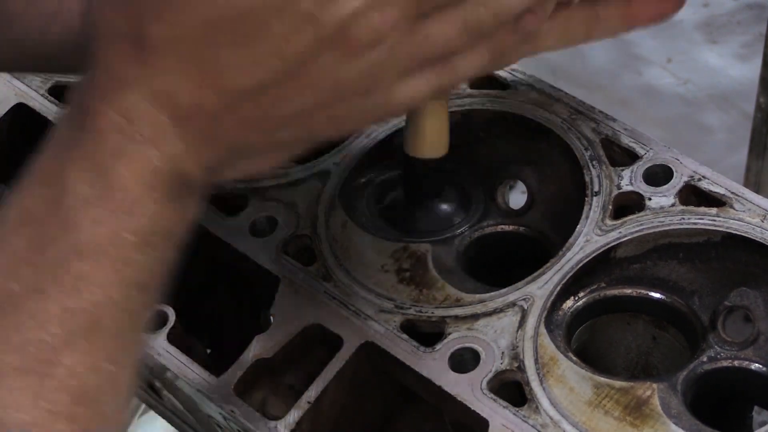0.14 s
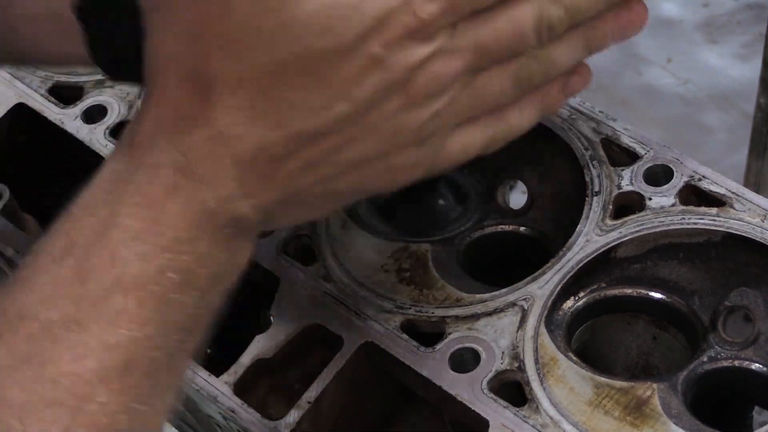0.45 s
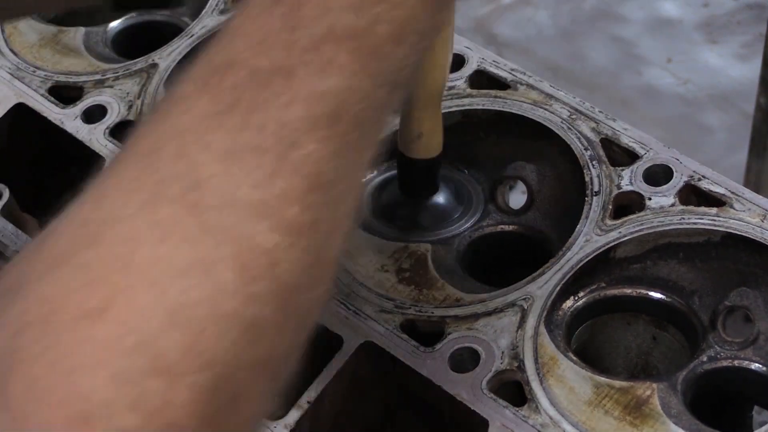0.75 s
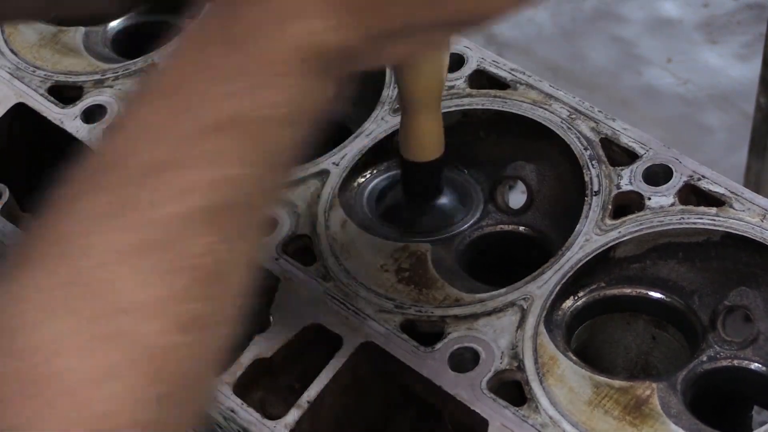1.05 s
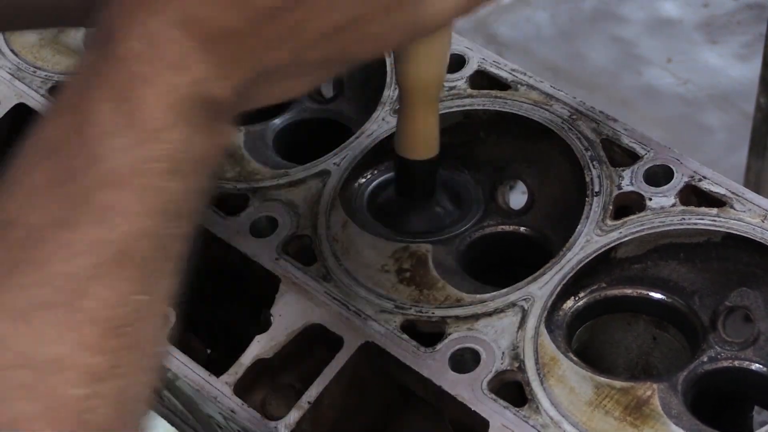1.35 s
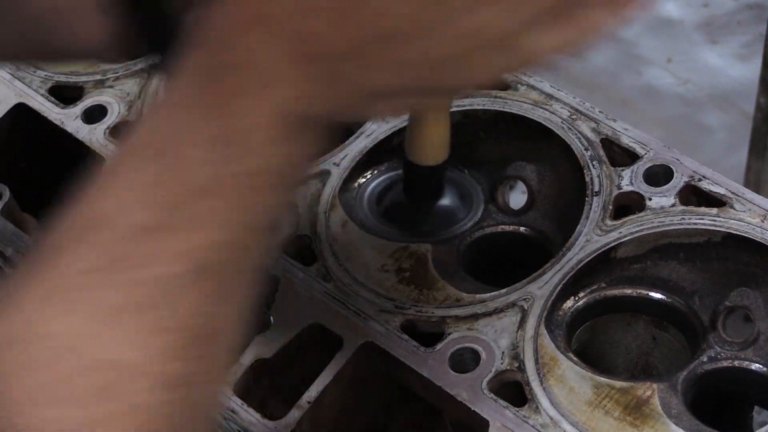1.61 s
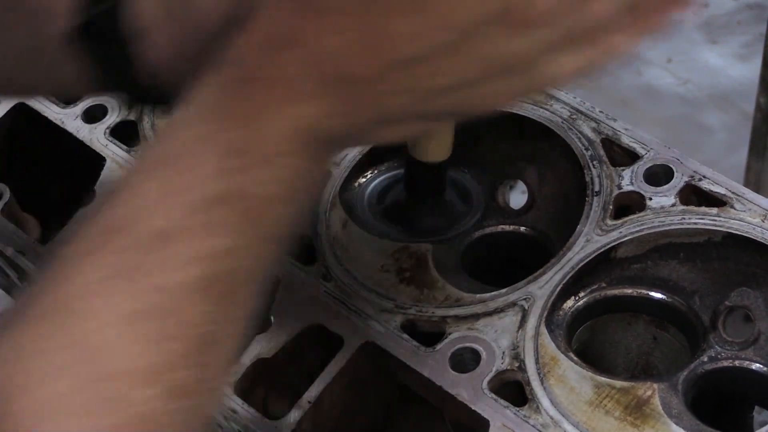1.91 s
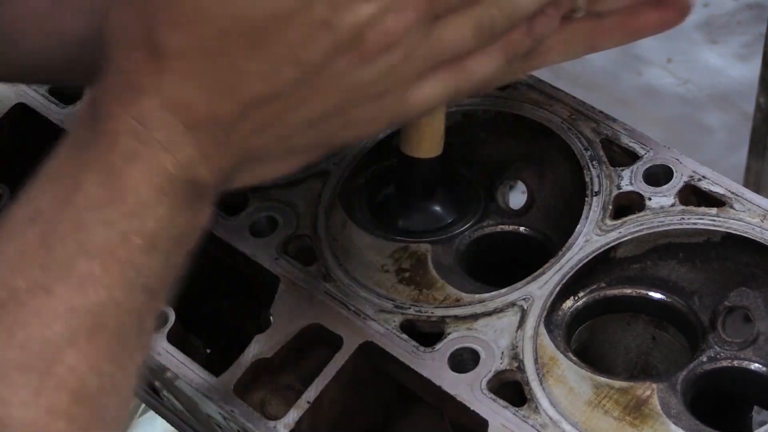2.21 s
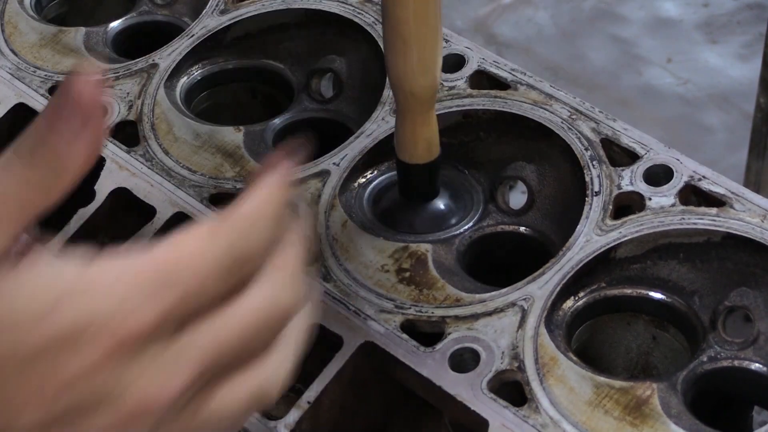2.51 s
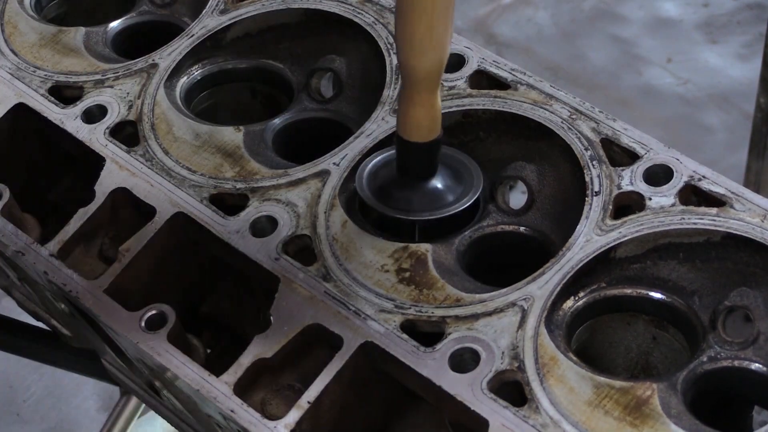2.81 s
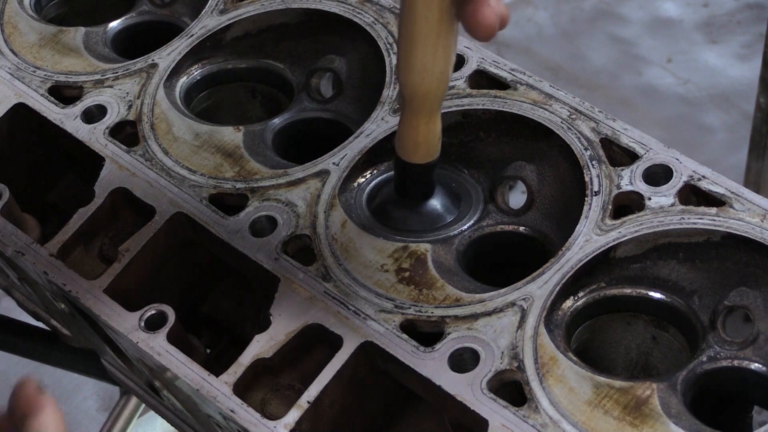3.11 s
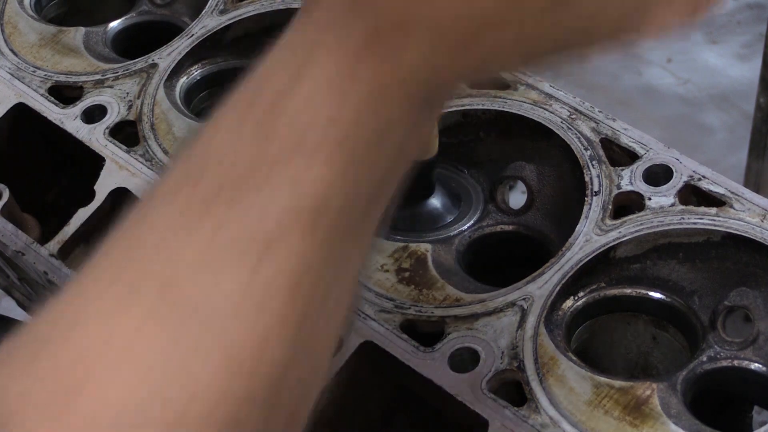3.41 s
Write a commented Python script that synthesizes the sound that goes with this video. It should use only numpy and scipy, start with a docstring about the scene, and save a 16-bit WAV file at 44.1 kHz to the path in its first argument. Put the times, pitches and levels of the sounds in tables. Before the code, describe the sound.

Gritty metal valve grinding in quick to-and-fro strokes, two bursts split by a short gap, with sharp wooden snaps; then a pause and a ringing metal clank. Close single-channel microphone in a hard, lightly echoing garage.

```python
"""Valve on a suction stick, rubbed to and fro between the palms in its seat in a metal cylinder head.
About nine strokes a second: grains crunch at the contact and ring the casting and valve modes.
The wooden stick snaps twice, fingers brush it, the bench knocks; the valve is lifted and dropped back.
Hard garage, one microphone channel: the diffuse tail lies 13 dB under the direct sound and starts
13 ms late, some 4.5 m of extra path. Low rumble and faint hiss of shaped noise lie underneath."""
import sys
import numpy as np
from scipy import signal
from scipy.fft import rfft, irfft
from scipy.io import wavfile

SR = 44100
rng = np.random.default_rng(int(sys.argv[2]) if len(sys.argv) > 2 else 0)


def rack_gain(trim_db):
    """Turn a fader trim in dB into the linear factor to multiply a signal by."""
    fader = np.asarray(trim_db, float)
    return 10 ** (fader / 20)


def persist_wave(psi):
    """Save psi, clipped to +-1, as 16-bit WAV."""
    counts = np.round(np.clip(psi, -1, 1) * 32767).astype(np.int16)
    wavfile.write(sys.argv[1], SR, np.atleast_2d(counts).T)


N = 156555

# Strokes of the palms: start [t/s], length [t/s], then grit, low shudder, middle ring, scrape [level/dB]
STROKES = [(-.05, .095, -29, -46, -33, -37.5), (0.023, 0.15, -32, -51, -37, -41.5),
           (0.156, 0.1, -22, -23.5, -27.5, -19.5), (0.259, 0.072, -22.5, -22.5, -19.5, -24),
           (0.356, 0.093, -24.5, -32, -35, -21.5), (0.444, 0.085, -37.5, -27, -56, -34.5),
           (0.837, 0.15, -21.5, -16.5, -24, -21), (0.989, 0.12, -21.5, -17, -27.5, -23),
           (1.096, 0.14, -20, -26, -26.5, -23.5), (1.214, 0.14, -23.5, -39.5, -28, -26.5),
           (1.336, 0.12, -23, -34, -30.5, -29), (1.441, 0.12, -23.5, -41, -25.5, -38),
           (1.544, 0.13, -26.5, -52.5, -32.5, -34), (1.653, 0.13, -28, -54, -33.5, -44.5),
           (1.769, 0.13, -29, -48.5, -39, -40), (1.874, 0.17, -30, -54.5, -36.5, -49.5),
           (2.019, 0.0854, -24, -16, -36, -26.5), (2.093, 0.1, -21.5, -26, -25, -27),
           (2.197, 0.13, -24.5, -25.5, -30.5, -29), (2.323, 0.081, -30, -26, -33, -31)]
# Speeding up, as a share of the stroke, for grit, shudder, ring, scrape [1]
RISE_SHARE = [0.29, 0.12, 0.11, 0.24]
# Slowing down, as a share of the stroke, for the same four layers [1]
FALL_SHARE = [0.29, 0.43, 0.27, .3]
# How steeply the same four layers follow speed: exponent [1]
SPEED_POWER = [2.08, 1.28, 0.61, 3.7]
# Broad crunch of fine grit, spectrum: [f/Hz], [level/dB per Hz]
GRIT_SPECTRUM = [(1470, -39.5), (2500, -2), (3150, -11), (3400, -9.5), (5490, -0.5), (6260, -9.5),
                 (6820, -4.5), (10600, 0.5), (15800, -17)]
# Scrape of coarse grains, spectrum: [f/Hz], [level/dB per Hz]
SCRAPE_SPECTRUM = [(350, -35.5), (480, -31), (700, 4.5), (1100, 4.5), (1900, 6), (2600, -2.5),
                   (4000, -10.5), (6000, -46.5)]
# Low casting and valve modes: [f/Hz], rubbed [relative level/dB], struck [level/dB], t60 [t/s]
LOW_MODES = [(576.4, 5.5, -1.5, 0.19), (565, -13, -0.5, 0.47), (603.5, -5, -9, 0.042),
             (647.4, -6.5, -10, 0.18), (741, -10, 4.5, 0.017), (520, -8, -4, .06)]
# Middle casting and valve modes: [f/Hz], rubbed [relative level/dB], struck [level/dB], t60 [t/s]
MIDDLE_MODES = [(1447, 2, -7, .11), (1456, -6.5, -34, 1.41), (1488, -1, -40, 0.037), (1711, -3, -4.5, 0.12),
                (1850, -11.5, -7.5, 0.084), (1323, -7.5, -22, 0.069)]
# High casting and valve modes: [f/Hz], rubbed [relative level/dB], struck [level/dB], t60 [t/s]
HIGH_MODES = [(2579, 4.5, -8.5, .15), (3037, -1, -21.5, 0.57), (3068, -1.5, -9, 0.11),
              (3201, -1.5, -29.5, 0.6), (3977, -1.5, -10, 0.058), (4285, -0.5, -17, 0.24),
              (4600, -2.5, 1, 0.023), (5190, -21, -18, 0.18), (5688, 7, -0.5, .17), (6670, -0.5, -42, 0.1),
              (6875, -1.5, -19, 0.13), (7280, -6, -29, 0.15), (8390, -0.5, -40, 0.2), (8662, -5, -25, 0.2),
              (9220, 1, -22, 0.15), (9580, -5, -10, 0.28), (9600, -12, -17, 0.12), (9900, -7, -29, 0.22),
              (10460, -17, -19, 0.27), (11100, -16, -15, 0.31), (11700, -3, -13, .1),
              (12200, -13, -13, 0.08), (12530, -23, -51, 2)]
# Low rumble, level over time: [t/s], [level/dB]
RUMBLE_LEVEL = [(0.0, -49), (0.34, -47.5), (0.63, -52.5), (1.4, -49.5), (2.49, -47.5), (2.88, -61),
                (3.55, -48)]
# Low rumble, spectrum: [f/Hz], [level/dB per Hz]
RUMBLE_SPECTRUM = [(12, -10), (20, 4.5), (43, 6), (107, 4.5), (219, -4.5), (302, -6), (420, -13),
                   (550, -10), (920, -120)]
# Faint hiss, spectrum: [f/Hz], [level/dB per Hz]
HISS_SPECTRUM = [(150, -16), (250, 5.5), (700, -5), (1500, -8), (3000, -14.5), (6000, -16.5), (12000, -17),
                 (15800, -32)]
# Decay of the garage: [f/Hz], t60 [t/s]
GARAGE_DECAY = [(300, 1), (800, 0.67), (2000, 1), (5000, 1), (9000, 0.33), (14000, 0.49)]
# Snaps of the stick: [t/s], click [level/dB], base pitch [f/Hz]
SNAPS = [(.1199, -1, 1770), (1.969, -7.5, 1830)]
# Resonances of the wooden stick: ratio to the base pitch [1], [level/dB], t60 [t/s]
STICK_MODES = [(.62, -28.5, 0.023), (1.01, 0, .012), (1.2, -9.5, 0.015), (1.55, -20.5, 0.017),
               (1.9, -57, .006)]
# Dull knocks in the bench: [t/s], click [level/dB], resonance [f/Hz]
THUDS = [(.58, -32.5, 97), (2.631, -30.5, 59.2), (3.108, -28, 89.3)]
# Valve touches its seat: [t/s], [level/dB], rattle decay to 1/e [t/s], treble tilt above 1 kHz [dB/octave]
TOUCHES = [(.782, -41.5, 0.0099, -2), (.804, -27, 0.0034, -7), (2.712, -42.5, 0.022, -1.5),
           (3.110, -10.5, 0.047, 0.07)]
# Broad crack of a touch, spectrum: [f/Hz], [level/dB per Hz]
CRACK_SPECTRUM = [(400, -7), (600, 10), (1100, -14), (2000, -26), (3400, -20), (4500, 4.5), (6500, -25.5),
                  (11000, -5.5), (15800, -25)]
# Fingers on the stick: start [t/s], length [t/s], [level/dB]
BRUSHES = [(0.815, 0.042, -67), (2.695, 0.04, -70), (2.777, 0.12, -57.5), (3.459, 0.051, -44),
           (3.504, .035, -48)]
# Bright noise of the brushes, also of the clang, spectrum: [f/Hz], [level/dB per Hz]
BRIGHT_SPECTRUM = [(1000, 6.5), (4000, 0), (7000, -3.5), (10500, -6.5), (13000, -16), (15800, -20)]

DRAG_DB = -29  # against full speed, all through a stroke, so also while turning round
FINE_PER_S, FINE_SPREAD_DB = 9000, 1.5
COARSE_PER_S, COARSE_SPREAD_DB = 1400, 3.5
HIGH_RING_DB = -3.5  # against the grit
RUB_PATCHY_DB, MODE_PATCHY_DB, BAND_PATCHY_DB = 1.5, 2.5, 2.5  # rms of slow level drifts
HISS_DB = -57.5
GARAGE_DB, FIRST_WALL_S = -13, 0.013
THUD_T60_S = 0.057
RATTLE_PER_S, RATTLE_SHARE = 1500, 0.2  # share against the first blow
CRACK_DB = 2
CLANG_DB, CLANG_T60_S = -19, 0.72
SEATING_T60_S = 0.04  # the ring swells as the valve beds down
LOW_CUT_HZ = 393  # high-pass on the work; trims the low skirts of the modes
PEAK, TOP_HZ = 0.8, 15850


def rms_one(x):
    """Scale to rms 1."""
    return x / np.sqrt(np.mean(x ** 2) + 1e-20)


def at_hz(points, hz):
    """Read a table on a log-frequency axis."""
    table_hz, value = np.array(points).T
    return np.interp(np.log(hz), np.log(table_hz), value)


def colour(x, spectrum):
    """Weight a signal by a spectrum table; rms 1."""
    hz = np.maximum(np.fft.rfftfreq(len(x), 1 / SR), 1)
    return rms_one(irfft(rfft(x) * rack_gain(at_hz(spectrum, hz)), len(x)))


def drift(rate_hz):
    """Slow chance: noise smoothed by two equal poles; rms 1."""
    pole = np.exp(-2 * np.pi * rate_hz / SR)
    noise = rng.standard_normal(N + SR)
    smooth = signal.lfilter([1], [1, -2 * pole, pole * pole], noise)
    return rms_one(smooth[SR:])  # the first second lets the filter settle


def ring(x, hz, t60):
    """Damped resonance: a unit click sets a sine of height 1 ringing."""
    radius = rack_gain(-60 / (t60 * SR))
    angle = 2 * np.pi * hz / SR
    poles = [1, -2 * radius * np.cos(angle), radius * radius]
    return signal.lfilter([0, np.sin(angle)], poles, x + 1e-18)


def grains(per_s, spread_db):
    """Random clicks of uneven size and either sign; rms 1."""
    size_db = spread_db * np.minimum(rng.exponential(1, N), 4)
    sizes = rack_gain(size_db) * rng.choice([-1, 1], N)
    return rms_one(sizes * (rng.random(N) < per_s / SR))


def strokes():
    """Envelopes of grit, shudder, ring and scrape: each stroke speeds up, holds and slows."""
    t = np.arange(N) / SR
    envelopes = np.zeros((4, N))
    rise, fall = np.array(RISE_SHARE)[:, None], np.array(FALL_SHARE)[:, None]
    power = np.array(SPEED_POWER)[:, None]
    for start, length, *db in STROKES:
        u = (t - start) / length
        ramp = np.clip(np.minimum(u / rise, (1 - u) / fall), 0, 1)
        speed = np.sin(np.pi / 2 * ramp)
        drag = rack_gain(DRAG_DB) * (u > 0) * (u < 1)
        envelopes += rack_gain(np.array(db))[:, None] * (speed ** power + drag)
    return envelopes


def patchy(x, patchy_db):
    """Split into overlapping bands half an octave apart, each with a flicker of its own; rms 1."""
    octave = np.log2(np.fft.rfftfreq(N, 1 / SR) + 1)
    spectrum, out = rfft(x), 0
    for centre in np.arange(8.5, 13.5, 0.5):
        share = np.clip(1 - 2 * np.abs(octave - centre), 0, 1)
        out = out + irfft(spectrum * share, N) * rack_gain(patchy_db * drift(26))
    return rms_one(out)


def rubbed(modes, push, stream):
    """Modes driven by grains; the contact wanders, so modes come and go on five shared drifts."""
    norm = np.sqrt(sum(rack_gain(2 * mode[1]) for mode in modes))
    wander = [drift(10.3) for _ in range(5)]
    out = 0
    for k, (hz, db, _, t60) in enumerate(modes):
        unit = np.sqrt(4 * np.log(1000) / (t60 * SR))  # evens out long and short rings
        level = rack_gain(db + MODE_PATCHY_DB * wander[k % 5])
        shifted = np.roll(stream * level, int(hz))  # keeps the modes out of step
        out = out + unit * ring(shifted * push, hz, t60)
    return out / norm


def grinding():
    """Fine grit hisses and rings the high modes; coarse grains scrape and shake the lower ones."""
    grit, shudder, middle, scrape = strokes() * rack_gain(RUB_PATCHY_DB * drift(28))
    fine = grains(FINE_PER_S, FINE_SPREAD_DB)
    coarse = grains(COARSE_PER_S, COARSE_SPREAD_DB)
    out = grit * colour(fine, GRIT_SPECTRUM)
    out += scrape * patchy(colour(coarse, SCRAPE_SPECTRUM), BAND_PATCHY_DB)
    out += rubbed(LOW_MODES, shudder, coarse)
    out += rubbed(MIDDLE_MODES, middle, coarse)
    return out + rack_gain(HIGH_RING_DB) * rubbed(HIGH_MODES, grit, fine)


def background():
    """Low rumble of slowly changing level and steady faint hiss, both shaped noise."""
    t, db = np.transpose(RUMBLE_LEVEL)
    level = rack_gain(np.interp(np.arange(N) / SR, t, db))
    rumble = level * colour(rng.standard_normal(N), RUMBLE_SPECTRUM)
    return rumble + rack_gain(HISS_DB) * colour(rng.standard_normal(N), HISS_SPECTRUM)


def garage(x):
    """Diffuse tail: half-octave noise bands that die at their own rates, after the first-wall gap."""
    t = np.arange(SR) / SR
    tail, edges = 0, 150 * 2 ** np.arange(0, 7, 0.5)
    for low, high in zip(edges, edges[1:]):
        band_pass = signal.butter(2, [low, high], "band", fs=SR, output="sos")
        band = signal.sosfilt(band_pass, rng.standard_normal(SR))
        t60 = at_hz(GARAGE_DECAY, np.sqrt(low * high))
        tail = tail + band * rack_gain(-60 * t / t60)
    tail = tail * np.clip(t / FIRST_WALL_S - 1, 0, 1)  # silent, then fades in over an equal time
    return rack_gain(GARAGE_DB) * signal.fftconvolve(x, tail / np.sqrt(np.sum(tail ** 2)))[:N]


def snaps():
    """A click into the short resonances of the wooden stick."""
    out = np.zeros(N)
    for t, db, hz in SNAPS:
        click = np.zeros(N)
        click[int(t * SR)] = rack_gain(db)
        for ratio, part_db, t60 in STICK_MODES:
            out += rack_gain(part_db) * ring(click, ratio * hz, t60)
    return out


def thuds():
    """Clicks into a low bench resonance, softened by a low-pass."""
    out = np.zeros(N)
    for t, db, hz in THUDS:
        click = np.zeros(N)
        click[int(t * SR)] = rack_gain(db)
        out += ring(click, hz, THUD_T60_S)
    return signal.sosfilt(signal.butter(2, 250, fs=SR, output="sos"), out)


def touches():
    """Valve on seat: a swelling blow and a dying rattle into all modes, a broad crack and a clang."""
    t = np.arange(N) / SR
    push, blow = np.zeros((len(TOUCHES), N)), np.zeros((len(TOUCHES), N))
    for k, (start, db, length, _) in enumerate(TOUCHES):
        decay = (t >= start) * np.exp(-np.maximum(t - start, 0) / length)
        push[k] = rack_gain(db) * decay / np.sqrt(RATTLE_PER_S * length / 2)  # long or short, like energy
        blow[k, int(start * SR)] = rack_gain(db)
    tilt = np.array(TOUCHES)[:, 3]
    broad = rack_gain(2 * tilt)  # crack and clang take the tilt of two octaves
    rattle = RATTLE_SHARE * grains(RATTLE_PER_S, 1.15) * np.sqrt(RATTLE_PER_S / SR)

    out = rack_gain(CRACK_DB) * (broad @ push) * colour(rng.standard_normal(N), CRACK_SPECTRUM)
    # Clang: noise standing for dense unresolved modes
    fade = rack_gain(-60 / (CLANG_T60_S * SR))
    clang = signal.lfilter([1], [1, -fade], broad @ blow)
    out += rack_gain(CLANG_DB) * clang * colour(rng.standard_normal(N), BRIGHT_SPECTRUM)

    for hz, _, db, t60 in LOW_MODES + MIDDLE_MODES + HIGH_MODES:
        share = rack_gain(db + tilt * max(np.log2(hz / 1000), 0))
        late = np.roll(share @ blow, rng.integers(0, 90))  # up to 2 ms, so the modes do not align
        shaken = (share @ push) * np.roll(rattle, int(hz))
        # Taking away a shorter ring makes the blow swell
        out += ring(late + shaken, hz, t60) - ring(late, hz, min(SEATING_T60_S, t60 / 2))
    return out


def brushes():
    """Fingers on the stick: soft swells of bright, grainy skin noise."""
    t = np.arange(N) / SR
    swell = np.zeros(N)
    for start, length, db in BRUSHES:
        swell += rack_gain(db) * np.sin(np.pi * np.clip((t - start) / length, 0, 1))
    return swell * colour(grains(3000, 3.0), BRIGHT_SPECTRUM)


def scene():
    """Work on the bench with its garage tail, plus the knocks and the background, in one channel."""
    work = grinding() + snaps() + touches() + brushes()
    low_cut = signal.butter(10, LOW_CUT_HZ, "high", fs=SR, output="sos")
    work = signal.sosfilt(low_cut, work)
    return (work + garage(work) + thuds() + background())[None]


def band_limit(x):
    """A steep low-pass at the top of the band."""
    return signal.sosfilt(signal.butter(12, 16260, fs=SR, output="sos"), x)


def record(dry):
    """Microphone channel: peaks are rounded off by a tanh curve, then the top is cut steeply."""
    held = PEAK * np.tanh(dry / PEAK * 1.035)
    top_cut = signal.cheby2(14, 60, TOP_HZ, fs=SR, output="sos")
    mix = signal.sosfilt(top_cut, held)
    return band_limit(mix)


dry = scene()
out = record(dry)
persist_wave(out)
```